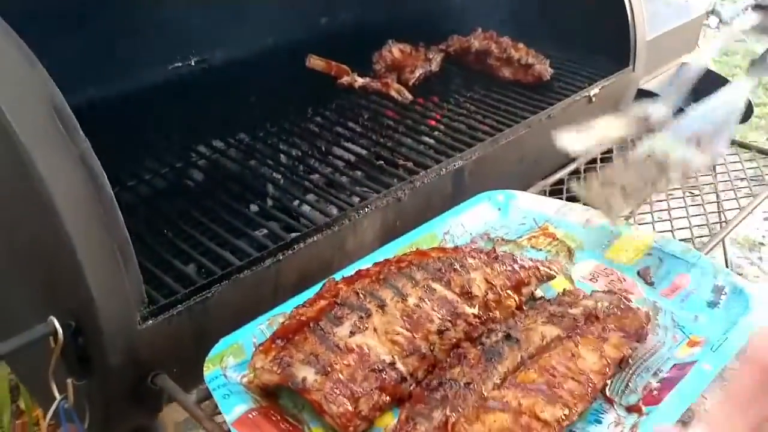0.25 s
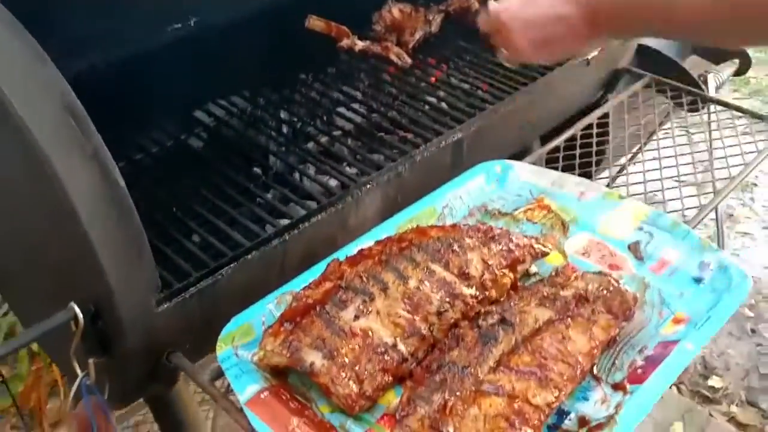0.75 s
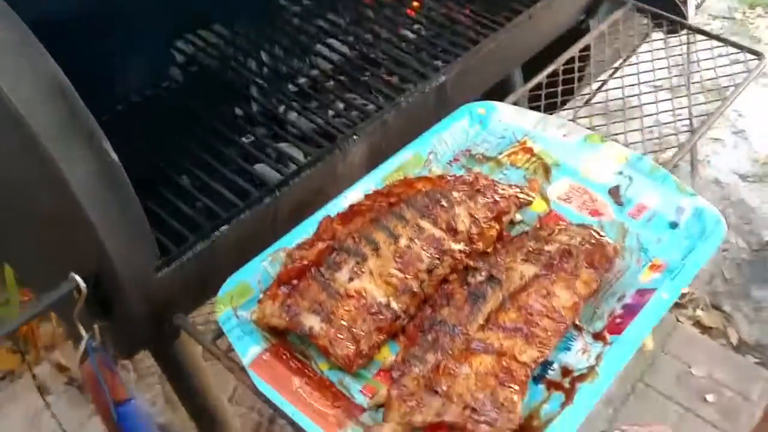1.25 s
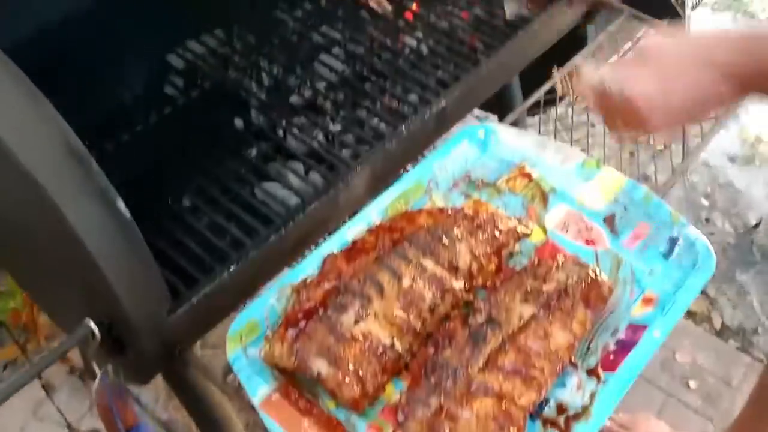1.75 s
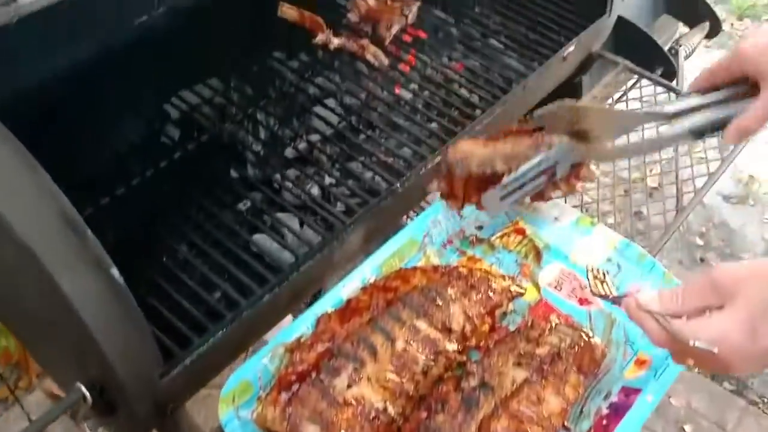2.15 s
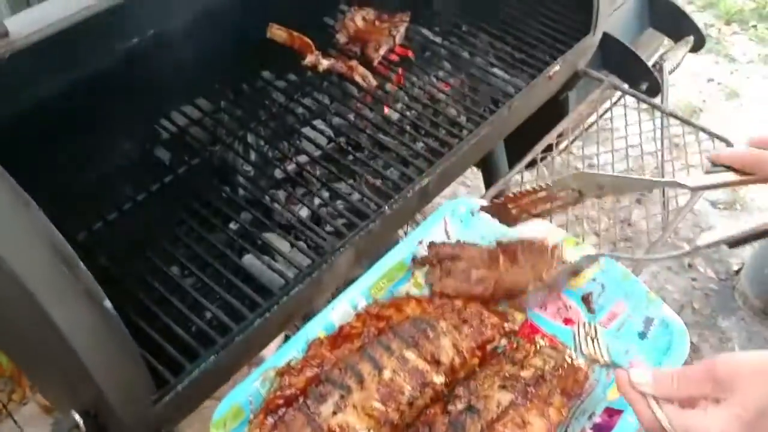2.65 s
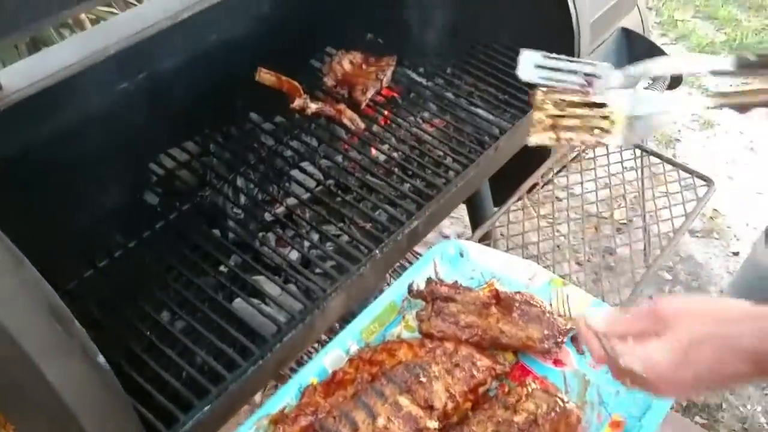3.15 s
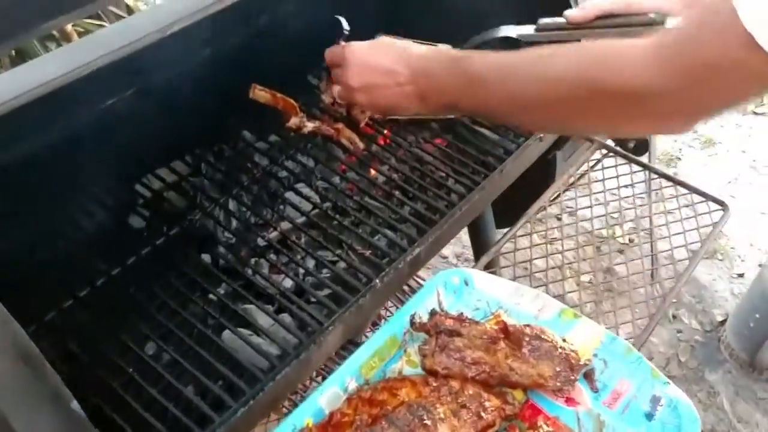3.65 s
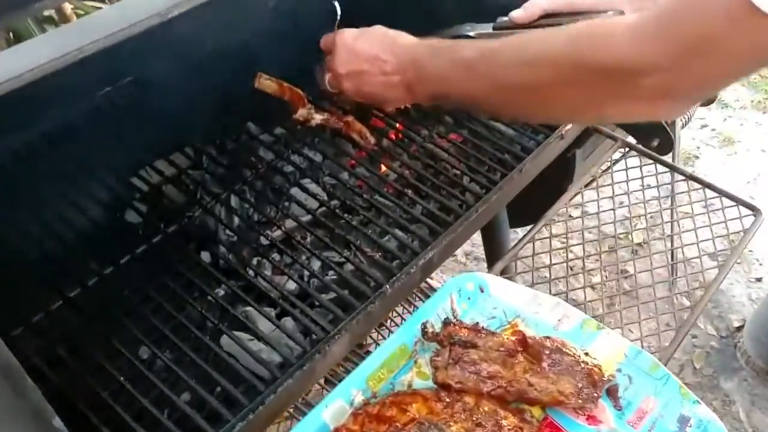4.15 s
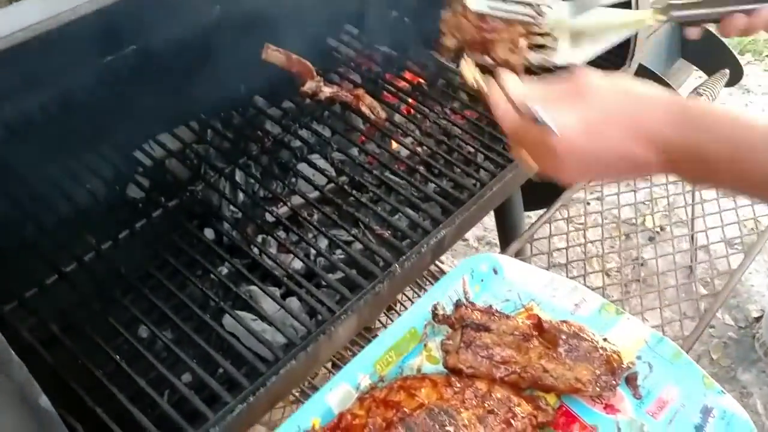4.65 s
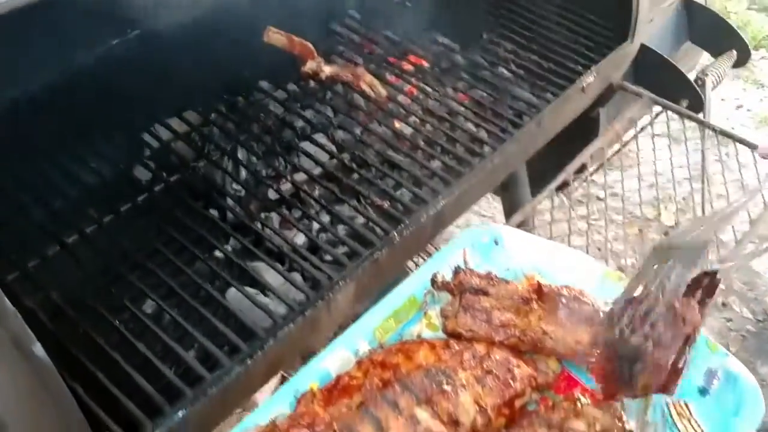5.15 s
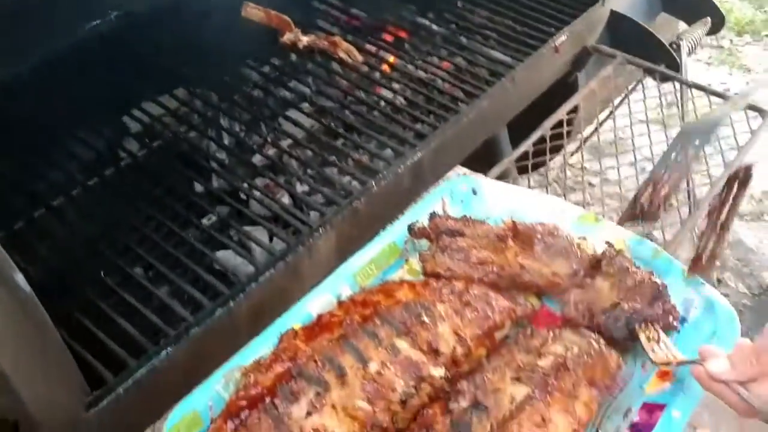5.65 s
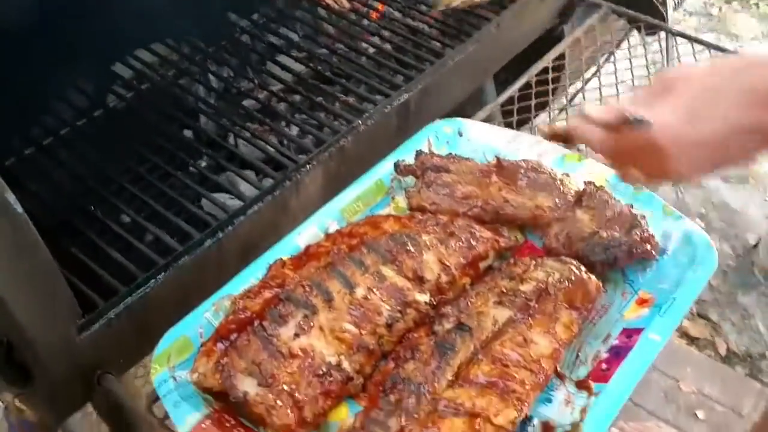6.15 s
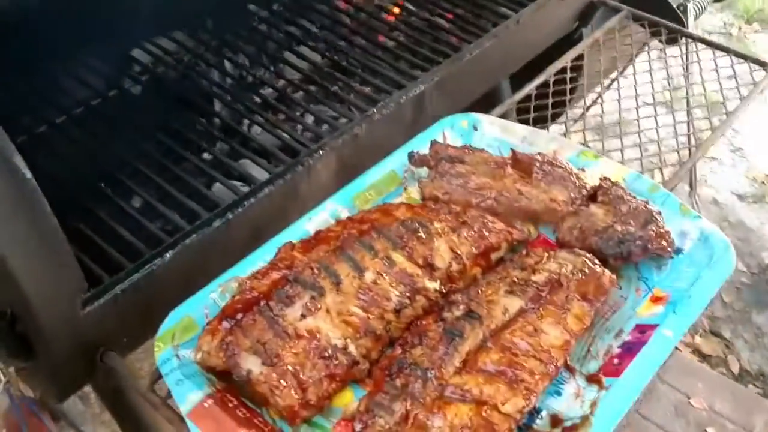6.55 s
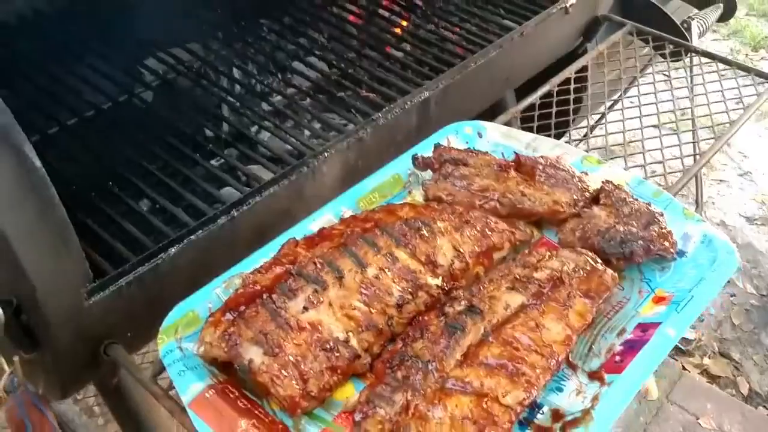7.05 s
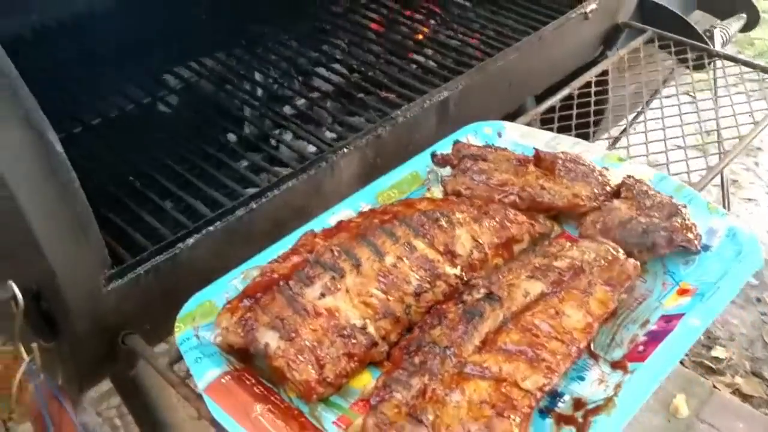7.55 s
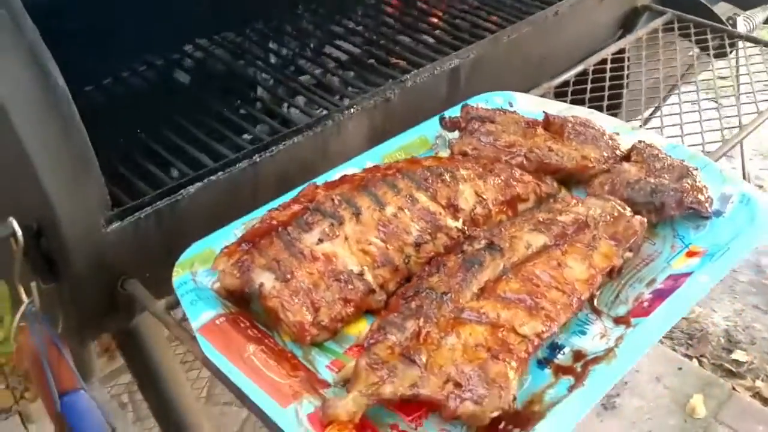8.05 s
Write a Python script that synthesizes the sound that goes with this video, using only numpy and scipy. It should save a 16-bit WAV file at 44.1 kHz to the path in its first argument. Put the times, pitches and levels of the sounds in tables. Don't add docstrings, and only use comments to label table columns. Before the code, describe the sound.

Fat sizzles and spits on a charcoal grill while steel tools scrape and clink on the grate and meat thuds onto a plastic tray.

```python
import sys
import numpy as np
from scipy import signal
from scipy.fft import rfft, irfft, next_fast_len
from scipy.io import wavfile
from scipy.ndimage import uniform_filter1d

SR = 44100
rng = np.random.default_rng(int(sys.argv[2]) if len(sys.argv) > 2 else 0)


def nominal_scale(level):
    x = np.asarray(level, float) / 20
    return 10 ** x


def dump_mix(stems):
    frames = np.atleast_2d(stems).T
    limited = np.clip(frames, -1, 1)
    pcm = np.round(limited * 32767).astype(np.int16)
    wavfile.write(sys.argv[1], SR, pcm)


N = 366471
FAST = next_fast_len(N)
TIME = np.arange(N) / SR
HZ = np.fft.rfftfreq(FAST, 1 / SR)


def unit(x):
    return x / np.sqrt(np.mean(x ** 2, axis=-1, keepdims=True))


def curves(table):
    s, *columns = np.vstack(table).T
    return [np.interp(TIME, s, c) for c in columns]


def colour(points):
    hz, db = np.transpose(points)
    return nominal_scale(np.interp(np.log(HZ + 1), np.log(hz), db))


def band(x, gain, lo_hz, hi_hz, order=6):
    lo_edge = 1 + (lo_hz / (HZ + 1)) ** (2 * order)
    hi_edge = 1 + (HZ / hi_hz) ** (2 * order)
    return unit(irfft(rfft(x, FAST) * gain / np.sqrt(lo_edge * hi_edge), FAST)[..., :N])


def bandpass(x, order, lo_hz, hi_hz):
    return signal.sosfilt(signal.butter(order, [lo_hz, hi_hz], "band", fs=SR, output="sos"), x)


def walk(rate_hz, channels=2):
    k = int(SR / rate_hz)
    held = np.repeat(rng.standard_normal((channels, N // k + 1)), k, axis=1)[:, :N]
    return unit(uniform_filter1d(held, k))


def grains(rate_hz, spread_db):
    hit = rng.random((2, N)) < rate_hz / SR
    size_db = spread_db * np.minimum(rng.exponential(size=(2, N)), 3)
    return unit(hit * rng.standard_normal((2, N)) * nominal_scale(size_db))


def sides(pan_db, power=2):
    left = nominal_scale(pan_db)
    return (2 * np.array([left, left ** 0]) / (1 + left ** power) ** (1 / power)).reshape(2, -1)


def decay(t, t60_s):
    return nominal_scale(-60 * t / t60_s)


def ring(hz, t60_s, t, phase=0):
    return np.sin(2 * np.pi * hz * t + phase) * decay(t, t60_s)


def add(out, s, wave, db, pan_db, lag=5):
    wave = wave * nominal_scale(db) / np.abs(wave.mean(axis=0)).max()
    starts = int(s * SR) + int(lag), int(s * SR)
    for c, (gain, start) in enumerate(zip(sides(pan_db, power=0.93), starts)):
        out[c, start:start + wave.shape[1]] += gain * wave[c, :N - start]


def machine():
    # (time [s], level [dB])
    rumble = [(0.0, -58.5), (0.56, -58), (0.95, -59.5), (3.35, -59.5), (3.84, -55.5), (5.48, -57.5),
              (5.92, -74.5), (7.91, -80), (8.31, -63)]
    # (frequency [Hz], density [dB per Hz])
    air_spectrum = [(15, -54), (25, -27), (54, -22.5), (108, -6.5), (157, -3.5), (219, -2.5), (297, -20.5),
                    (334, -30), (413, -28), (763, -31), (966, -24.5), (1110, -34.5), (1440, -33.5),
                    (3000, -42), (7000, -43), (9100, -56), (15400, -120)]
    # (time [s], length [s], level [dB])
    booms = [
        (0.392, 0.071, -60),
        (2.41, 0.13, -49.5),
        (2.782, 0.13, -45),
        (3.916, 0.3, -49.5),
        (5.376, 0.063, -80),
        (6.95, 0.26, -61.5),
    ]
    low_db = curves(rumble)[0]
    drone_db = -56.5 + 0.13 * (low_db - low_db[0])
    deep_db = low_db + 2.5
    left = sides(17, power=1)
    boom = sum(nominal_scale(db) * np.exp(-((TIME - s) / length_s) ** 2) for s, length_s, db in booms)
    boom = boom * sides(-1.5, power=0.43)
    noise, gain = rng.standard_normal((3, N)), colour(air_spectrum)
    near = noise[0] + 0.58 * noise[1:]
    drone = band(near, gain, 162, 345) * nominal_scale(3.1 * walk(9, channels=1))
    deep = band(near, gain, 20, 128) * nominal_scale(1.8 * walk(13, channels=1))
    far = band(noise[1:], 1, 20, 70) * nominal_scale(-86 + 3 * walk(3, channels=1))
    return drone * (nominal_scale(drone_db) * left + boom) + deep * (nominal_scale(deep_db) * left + nominal_scale(-7.5) * boom) + far


def air_and_whine():
    # (frequency [Hz], density [dB per Hz])
    air_spectrum = [(15, -54), (25, -27), (54, -22.5), (108, -6.5), (157, -3.5), (219, -2.5), (297, -20.5),
                    (334, -30), (413, -28), (763, -31), (966, -24.5), (1110, -34.5), (1440, -33.5),
                    (3000, -42), (7000, -43), (9100, -56), (15400, -120)]
    noise = rng.standard_normal((2, N))
    air = band(noise, colour(air_spectrum), 328, 7800) * nominal_scale(-70) * sides(3.9)
    whine_hz, whine_db = 985, -79
    whine = band(noise, 1, whine_hz - 35, whine_hz + 35, order=40) * nominal_scale(whine_db + 2.5 * walk(7))
    return air + whine * sides(14)


def insect():
    # (time [s], level [dB])
    song = [(0, -101), (.9, -68), (1.5, -65), (2.9, -66), (3.6, -75), (8.31, -63)]
    noise = rng.standard_normal((2, N))
    return band(noise, 1, 7100, 10400, order=60) * nominal_scale(curves(song)[0]) * sides(9.2)


def strokes():
    # (time [s], hold [s], level [dB], low rub re level [dB], left minus right [dB])
    stroke_rows = [(0.79, 0.09, -68, 11, -8), (0.89, 0.12, -58, 2, -8), (0.996, 0.052, -55, 12, 18),
                   (1.173, 0.19, -55.5, -7, 3), (3.63, 0.23, -74, 9, -16), (3.938, 0.24, -56, 1, -11),
                   (4.086, 0.084, -49.5, -4, -12), (4.392, 0.027, -56, 4, -8),
                   (4.56, 0.74, -57.5, -32, -28), (5.378, 0.03, -52.5, -7, -6),
                   (5.727, 0.27, -59.5, -28, -34), (6.637, 0.39, -60.5, -0.5, -14),
                   (7.107, 0.17, -64.5, 5, -12), (7.397, 0.57, -71.5, -6, -19),
                   (7.923, 0.26, -71, 4.5, -12), (8.241, .07, -44.5, -8.5, -7)]
    press_db_per_s, lift_db_per_s, rest_db = 600, 91, -81
    power = np.ones((2, 2, N)) * nominal_scale(2 * rest_db)
    for s, hold_s, db, rub_db, pan_db in stroke_rows:
        press_db = press_db_per_s * np.maximum(s - TIME, 0)
        lift_db = lift_db_per_s * np.maximum(TIME - s - hold_s, 0)
        parts = np.array([1, nominal_scale(rub_db)])[:, None, None]
        power += (nominal_scale(db - press_db - lift_db) * sides(pan_db, power=1.9) * parts) ** 2
    return np.sqrt(power)


def scrape():
    # (frequency [Hz], width [Hz], level [dB])
    bar_modes = [
        (3001, 58, 0.5),
        (3180, 130, -7.5),
        (4083, 540, -5),
        (4520, 56, -1),
        (4680, 52, 1),
        (5060, 160, -4.5),
    ]
    ring_gain, rub_gain = strokes()
    slips = grains(2500, 2) + 0.88 * rng.standard_normal((2, N))
    slips = slips + 0.5 * slips[::-1]
    sung = nominal_scale(-8) + sum(nominal_scale(db) / (1 + (2 * (HZ - hz) / width_hz) ** 2) for hz, width_hz, db in bar_modes)
    bars = band(slips, sung, 3050, 8000) * ring_gain * nominal_scale(2.5 + 1.27 * walk(30))
    rub = band(slips, 1, 720, 2640) * rub_gain * nominal_scale(-7.5 + 2.4 * walk(24))
    return bars + rub


def clinks(out):
    # (time [s], length [s], pitch [Hz], level [dB])
    chirps = [(0.115, 0.029, 3205, -56), (.12, 0.04, 4100, -60), (0.338, 0.025, 1500, -59),
              (0.782, 0.21, 960, -64), (0.91, 0.07, 1050, -62), (0.85, 0.12, 3100, -61),
              (0.782, 0.23, 2070, -64), (2.747, 0.02, 4720, -44), (3.66, 0.13, 5300, -61),
              (3.66, 0.13, 2450, -58), (3.66, 0.13, 3950, -58), (3.889, 0.2, 3010, -58),
              (5.505, 0.04, 1600, -58), (6.623, 0.075, 3260, -57.5), (6.616, 0.19, 1866, -59.5),
              (6.735, 0.33, 2430, -65), (6.93, 0.15, 1060, -59), (6.72, 0.1, 1850, -61),
              (7.103, 0.32, 1410, -56.5), (7.06, 0.3, 2450, -65), (7.14, 0.1, 1950, -63),
              (7.36, 0.12, 4100, -66), (7.42, 0.044, 940, -58), (8.249, .04, 4600, -45),
              (8.236, 0.17, 2610, -52), (8.24, 0.22, 1600, -57), (8.25, 0.05, 8150, -43),
              (8.262, 0.05, 12300, -43), (8.262, 0.035, 10300, -46)]
    # (time [s], length [s], pitch [Hz], level [dB])
    creaks = [
        (2.545, 0.06, 2100, -62),
        (2.832, 0.041, 2120, -62),
        (3.222, 0.076, 1430, -70.5),
        (6.797, 0.24, 203, -51),
        (7.099, 0.13, 603, -61.5),
        (7.417, 0.12, 209, -50),
        (7.951, 0.084, 232, -47),
        (7.975, 0.075, 1127, -49),
        (8.001, 0.17, 103, -56.5),
        (3.62, 0.3, 88, -56),
    ]
    # (time [s], length [s],
    # pitch [Hz], level [dB])
    sweeps = [(4.046, 0.14, 1650, -55), (4.366, 0.023, 2800, -46.5), (1.314, 0.049, 4550, -47.5),
              (6.925, 0.06, 4000, -55), (3.935, 0.33, 5300, -52), (4.372, 0.1, 1600, -60),
              (5.697, 0.04, 2800, -59), (2.378, 0.08, 4800, -60), (1.2, 0.25, 4800, -57),
              (7.44, 0.2, 11800, -43), (1.2, 0.22, 8700, -38), (7.946, 0.0217, 2900, -41),
              (7.955, 0.099, 3960, -53.5), (8.185, 0.03, 4200, -47.5)]
    rubs = []
    for rows, pan_db in ((chirps, -10.5), (creaks, 4)):
        rubs += [(*row, 130 * (row[2] / 1000) ** 0.45, pan_db) for row in rows]
    rubs += [(*row, 0.68 * row[2], -5 + 1) for row in []] + [(*row, 0.68 * row[2], 4) for row in []]
    rubs += [(*row, 0.68 * row[2], SWEEP_PAN_DB) for row in sweeps]
    for s, length_s, hz, db, width_hz, pan_db in rubs:
        t = TIME[:int(1.5 * length_s * SR)]
        noise = rng.standard_normal((4, 24000))[:, :len(t)]
        uneven_db = 2.34 * unit(uniform_filter1d(noise[3], size=300))
        slips = (noise[0] + 0.69 * noise[1:3]) * nominal_scale(uneven_db)
        sing = unit(bandpass(slips, 2, hz - width_hz / 2, hz + width_hz / 2))
        shape = np.minimum(t / (0.002 + 0.06 * length_s), 1) * nominal_scale(-10 * (t / length_s) ** 2.2)
        start = int(s * SR)
        wave = (sing * shape * nominal_scale(db) * sides(pan_db, power=3.8))[:, :N - start]
        out[:, start:start + wave.shape[1]] += wave


SWEEP_PAN_DB = -5


def snaps(out):
    # (time [s], peak [dB], left minus right [dB], lowest frequency [Hz], decay [s])
    snap_rows = [(0.989, -16, 14, 800, .012), (1.0768, -17, 10, 700, .012), (2.3775, -24, -5, 2800, .012),
                 (2.369, -36, -5, 1500, .01), (3.629, -42, -2, 800, .02), (4.3655, -16, -13, 950, .03),
                 (5.3555, -18, -10, 1500, .015), (6.929, -34, -7, 2800, .04), (7.135, -26, -7, 3300, .025),
                 (7.946, -34, -11, 2000, .03), (1.3185, -30, -2, 3500, .03), (5.383, -30, 0, 900, .01),
                 (3.948, -33, -8, 1800, .02), (7.0612, -45, -9, 3000, .02), (6.6375, -42, -9, 2600, .03)]
    t = TIME[:6000]
    for s, db, pan_db, lo_hz, t60_s in snap_rows:
        noise = rng.standard_normal((3, len(t)))
        burst = (noise[0] + 0.7 * noise[1:]) * (0.45 * decay(t, t60_s) + 0.04 * decay(t, 0.2))
        click = ring(1950, 0.0012, t) + 1.1 * ring(4000, 0.0011, t)
        add(out, s, bandpass(burst - click, 4, lo_hz, 8500), db, pan_db)


def knocks(out):
    # (time [s], peak [dB], strongest [Hz], decay [s], deep modes re peak [dB])
    blows = [
        (0.343, -31.5, 685, 0.11, -42),
        (2.35, -36, 799, 0.078, 3),
        (2.368, -29, 630, 0.049, 2),
        (2.377, -19, 705, 0.066, -13),
        (2.731, -17, 757, 0.058, -1.5),
        (2.737, -10.5, 816, 0.041, -19.5),
        (5.356, -12, 727, 0.073, -11),
        (5.689, -31.5, 665, 0.083, -27),
        (5.703, -24, 613, 0.068, -29),
    ]
    # (frequency [Hz], level [dB], decay [s])
    modes = [
        (389, -9.5, 0.12),
        (627, 1, 0.14),
        (880, -8, 0.016),
        (1360, 11, 0.019),
        (1600, -5.5, 0.033),
        (2060, -13, 0.0098),
        (2436, -3, 0.036),
        (3180, -58, 0.01),
    ]
    t = TIME[:9000]
    for s, db, hz, t60_s, deep_db in blows:
        plate = 0
        for (f, g, d), (a, b) in zip(modes, rng.random((len(modes), 2))):
            weight_db = deep_db + 16.5 if f < 500 else -14 * max(np.log2(hz / f), 0)
            plate = plate + nominal_scale(g + weight_db) * ring(f * (0.96 + 0.087 * a), d * t60_s / 0.1, t, 3 * b)
        noise = rng.standard_normal((3, len(t)))
        tail = 3.1 * decay(t, 0.55 * t60_s) + 0.58 * decay(t, 6.25 * t60_s)
        rattle = nominal_scale(0.2 * (db + 9.5)) * bandpass(noise[0] + 0.85 * noise[1:], 2, 0.5 * hz, 1500 + hz) * tail
        crack = nominal_scale(0.094 * db) * noise[1:] * (0.2 * decay(t, 0.024) + 0.035 * decay(t, 0.1))
        blow = 0.65 * plate + 0.85 * ring(hz, t60_s, t) + rattle + crack
        add(out, s, blow * np.minimum(t / 0.0013, 1), db - 0.33, -0.4)


def tray_buzz():
    # (time [s], level [dB])
    buzz_rows = [
        (5.365, -58),
        (5.382, -26),
        (5.46, -27.5),
        (5.52, -38),
        (5.59, -54),
        (5.62, -80),
    ]
    hum_hz = 194.5
    level_db = curves([(0, -200), *buzz_rows, (5.7, -200)])[0]
    turn = 2 * np.pi * hum_hz * TIME + 0.65 * walk(45, channels=1)[0]
    wave = np.cos(turn) + 0.056 * np.cos(2 * turn) + 0.022 * np.cos(3 * turn)
    return wave * nominal_scale(level_db) * sides(2.3, power=0.61)


def pops(out):
    # (time [s], peak [dB], centre [Hz], left minus right [dB])
    bursts = [(0.3331, -21, 12800, -11), (0.7437, -28, 9500, -7), (0.7725, -28, 7750, -15),
              (0.9518, -30, 9120, -21), (0.989, -15, 8980, 7.5), (1.078, -23, 7800, 23),
              (1.3178, -14, 8600, -12), (1.36, -19, 9800, -10.5), (2.3645, -22, 10700, -14),
              (2.3775, -21, 9000, -14), (2.7475, -22, 10160, -28), (3.631, -23, 13000, -18),
              (3.6645, -27, 9670, -12), (3.9155, -17, 9900, -8), (3.947, -13, 12700, -6),
              (4.366, -12, 9800, -10), (4.7072, -15.5, 12900, -12), (4.7215, -16, 13600, -11),
              (4.7586, -11, 12400, -5), (4.8848, -22, 9780, -5), (5.1106, -27, 9900, -26),
              (5.356, -12, 9900, -9), (5.4475, -21, 10800, -4), (5.839, -19.5, 11700, -16),
              (6.031, -22, 10700, -11), (6.2804, -22, 10040, -11), (6.4875, -20, 11300, -4),
              (7.1354, -14, 13400, -10.5), (7.9463, -12.5, 9400, -5), (8.1883, -21, 8330, -10),
              (8.251, -21, 8260, -23),
              (0.0266, -32, 8870, -7), (0.043, -28, 14000, -7.5), (0.1244, -30, 8680, -10.5),
             (0.1394, -28.5, 7800, -14), (0.204, -30, 8220, -13), (0.2274, -33, 8880, -12),
             (0.3606, -27, 8680, -12), (0.3752, -28, 8730, -10), (0.3935, -26, 13600, -7.5),
             (0.4705, -30, 8200, -10.0), (0.5104, -30.5, 8450, -16), (0.6985, -33, 7700, -6.5),
             (0.7896, -24, 13000, 0), (0.8415, -31, 7660, -11), (1.5868, -34, 12300, -10),
             (3.3657, -28, 9000, -15), (2.1246, -29, 12500, -25), (2.4244, -25, 9610, -9),
             (2.594, -29, 10000, -18), (2.8843, -28, 9760, -19), (2.9637, -28, 9140, -21),
             (3.0749, -28, 9450, -17), (3.2236, -27, 10500, -20), (3.7309, -27, 9010, -10),
             (3.8297, -25, 8560, -11), (6.5395, -22, 12400, -15), (8.1614, -21, 11200, -8),
             (0.4005, -28, 9500, -10), (4.076, -17, 9000, -8), (3.8821, -19, 10440, -12.0),
             (4.0153, -24, 10900, -5), (4.1836, -9.5, 13400, -2), (5.1407, -18.5, 12200, -13)]
    t = TIME[:1500]
    for s, db, hz, pan_db in bursts:
        lo_hz = max(0.65 * hz, 7300)
        spit = rng.standard_normal((2, len(t))) * (decay(t, 0.011) + 0.18 * decay(t, 0.15))
        droplet = 0.7 * ring(hz, 0.017, t)
        add(out, s, bandpass(spit + droplet, 7, lo_hz, 16000), db, pan_db)


def sizzle():
    # (time [s], level [dB], share of big drops [dB], left minus right of near, of far coals [dB])
    fat = [(0.0, -40.5, -27, -32, 6), (0.69, -42, -17, -48.5, 12), (1.02, -46, 2.5, -20, -3.5),
           (1.18, -31, -14, -24.0, -31), (1.43, -32, -8, -15, -12.5), (1.64, -41, -29, -23, -6),
           (2.2, -41, -49, -39, -31), (2.43, -41.5, -12, -11, 0), (2.61, -40.5, -31, -23, -19),
           (3.47, -43, -58, -28, -9), (3.73, -38.5, -18, -21, -5), (4.12, -28.5, -10.5, -7.5, -13),
           (4.33, -34.5, -11, -10, -3.5), (6.11, -37.5, -13.5, -14.5, -0.5), (6.62, -40, -27, -24, -11),
           (6.83, -36.5, -10.5, -11.5, -12.5), (8.12, -38, -18, -12, -7), (8.31, -33.5, -13, -6.5, -8.0)]
    # (frequency [Hz], density [dB per Hz])
    steam_spectrum = [(2060, -44), (3500, -9.5), (4080, -11.5), (4440, -37.5), (5320, -22), (5820, -15.5),
                      (9620, 1), (11100, 3), (15100, 12.5), (16000, 10), (16300, -29)]
    # (time [s], length [s], share of middle hiss hidden [1])
    shadows = [
        (.65, .07, .8),
        (.87, .05, .85),
    ]
    level_db, drops_db, hiss_pan_db, spray_pan_db = curves(fat)
    hiss_db = level_db - 4.5
    fry_db = level_db + drops_db - 0.5
    spray_db = level_db - 11 + 7 * (TIME > 3.92)
    shade = sum(share * np.exp(-((TIME - s) / length_s) ** 4) for s, length_s, share in shadows)
    spurts = signal.lfilter([1], [1, -np.exp(-1 / (0.01 * SR))], np.abs(grains(60, 1)))
    steam = rng.standard_normal((2, N)) * (1 + 0.24 * spurts / spurts.std()) + 0.86 * grains(1500, 1.8)
    gain = colour(steam_spectrum)
    hiss = band(steam, gain, 8090, 10700, order=9) * nominal_scale(hiss_db + 0.64 * walk(14)) * sides(hiss_pan_db)
    spray = band(steam, gain, 11700, 14000) * nominal_scale(spray_db + 0.43 * walk(15)) * sides(spray_pan_db)
    fry = band(steam, gain, 4510, 7770, order=9) * nominal_scale(fry_db + 1.5 * walk(20)) * sides(0.44 * hiss_pan_db)
    fry = fry * nominal_scale(0)
    middle_band = signal.butter(2, [8800, 12300], "band", fs=SR, output="sos")
    return hiss + spray + fry - shade * signal.sosfiltfilt(middle_band, hiss + spray)


def scene():
    events = np.zeros((2, N))
    clinks(events)
    snaps(events)
    knocks(events)
    pops(events)
    return machine() + air_and_whine() + insect() + scrape() + tray_buzz() + sizzle() + events


def starve(x, depth_db, spill_db, patchy_db, share):
    hz, _, z = signal.stft(x, SR, nperseg=2048)
    power = uniform_filter1d(np.abs(z) ** 2, size=11, axis=1) + 1e-18
    level_db = 10 * np.log10(power)
    loudest_db = level_db[:, hz > 1000].max(axis=(0, 1))
    weak = np.clip((loudest_db - level_db - depth_db) / spill_db, 0, 1) * (hz > 1150)[:, None]
    body_db = 10 * np.log10(power[:, (hz > 500) & (hz < 4000)].mean(axis=(0, 1)))
    weak = weak * (body_db - np.roll(body_db, 2) < 9)
    bands = np.round(26 * np.log2(1 + hz / 2000)).astype(int)
    luck = rng.standard_normal((2, 2, 3, bands[-1] + 1, z.shape[2]))
    luck = unit(uniform_filter1d(luck[0], size=2) + 2 * uniform_filter1d(luck[1], size=7))
    streaks, drops = (0.87 * luck[:, :1] + 0.5 * luck[:, 1:])[:, :, bands]
    dropped = drops < share * weak + hz[:, None] / 16000 - 3.3
    lost = np.abs(z) ** 2 < 0.5 * weak * power
    gain_db = weak * patchy_db * streaks - 50 * dropped * (weak > 0.2) - 14 * lost
    return signal.istft(z * nominal_scale(gain_db), SR, nperseg=2048)[1][:, :N]


def roll_off(x):
    return signal.sosfilt(signal.butter(12, 16520, fs=SR, output="sos"), x)


def record(dry):
    thin = starve(dry, depth_db=8, spill_db=10, patchy_db=5, share=2.35)
    top_edge = signal.ellip(8, 0.3, 45, 15500, fs=SR, output="sos")
    return roll_off(signal.sosfilt(top_edge, thin))


dry = scene()
out = record(dry)
dump_mix(out)
```